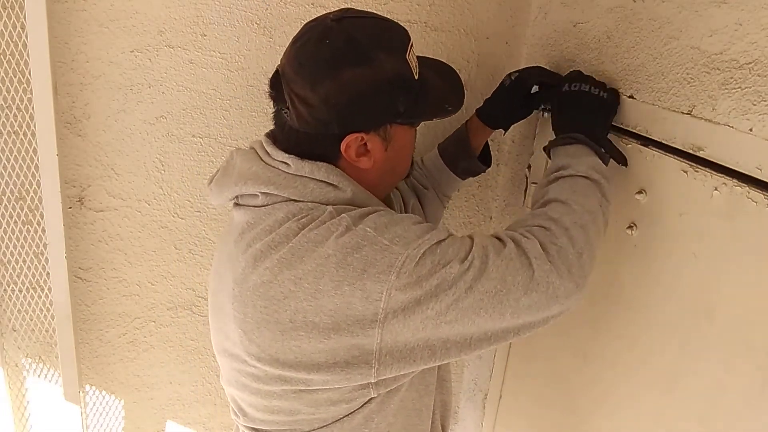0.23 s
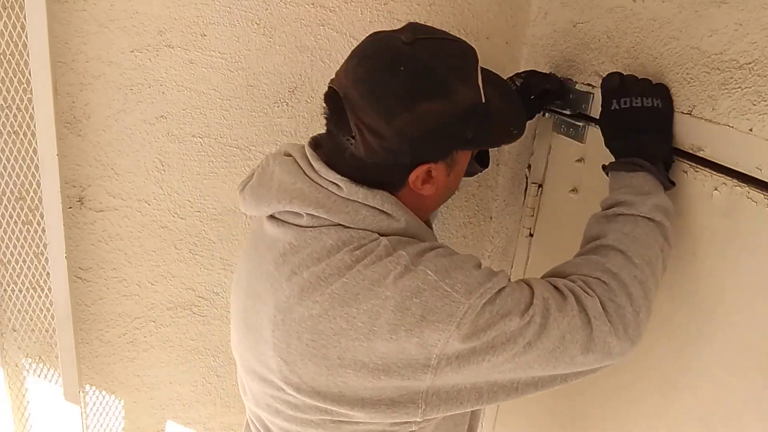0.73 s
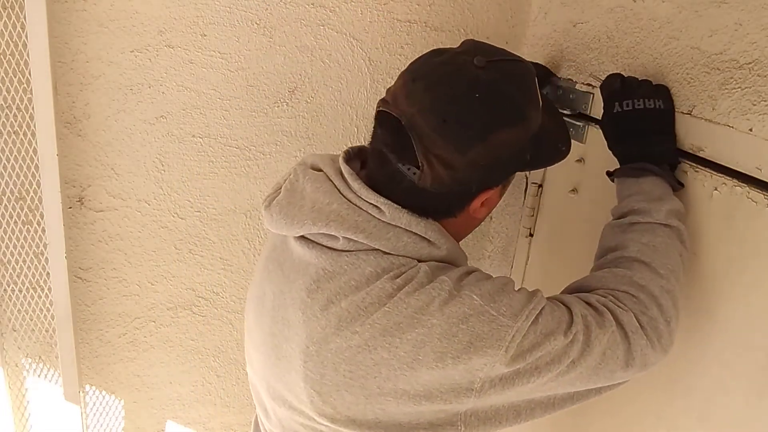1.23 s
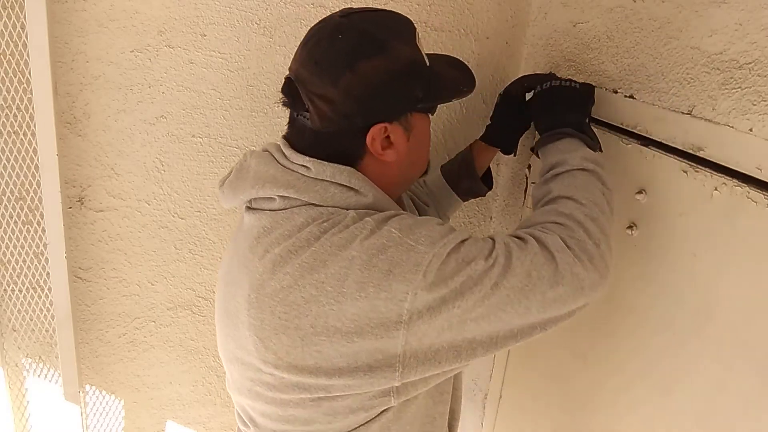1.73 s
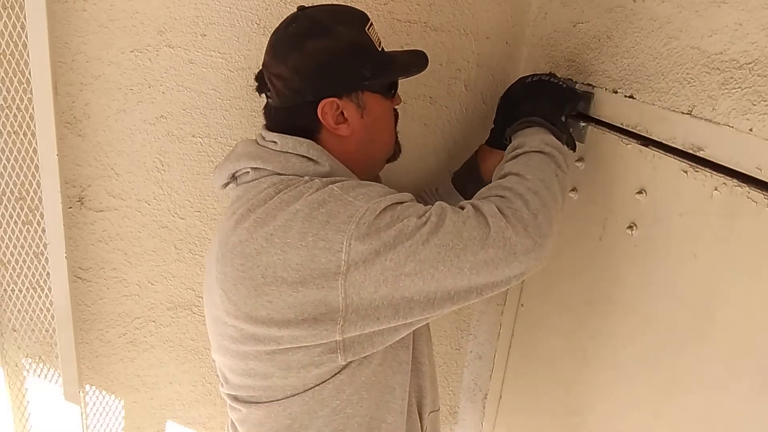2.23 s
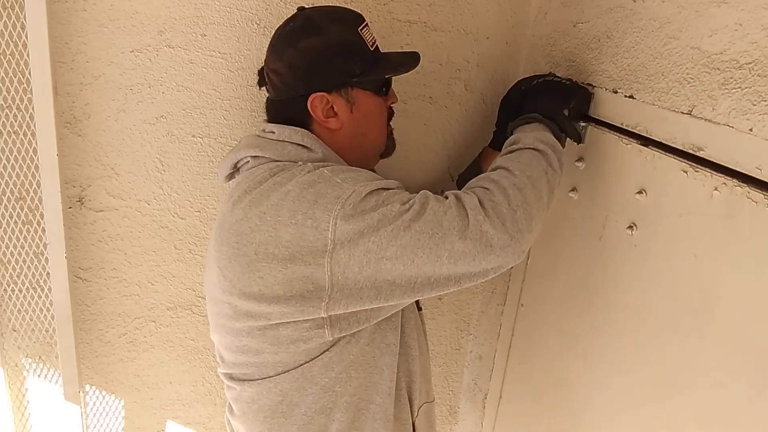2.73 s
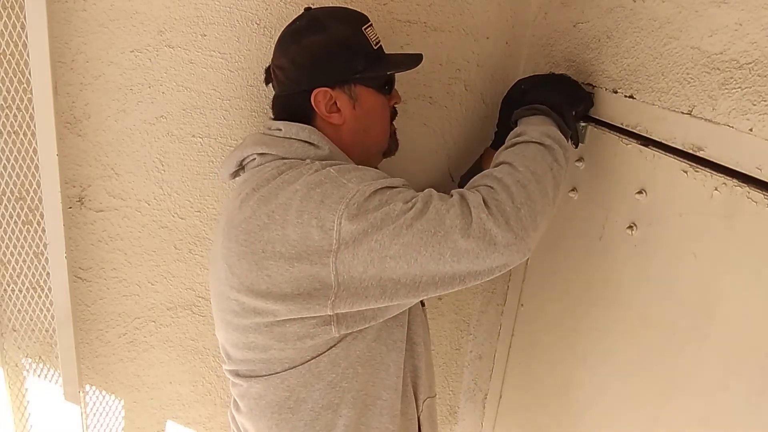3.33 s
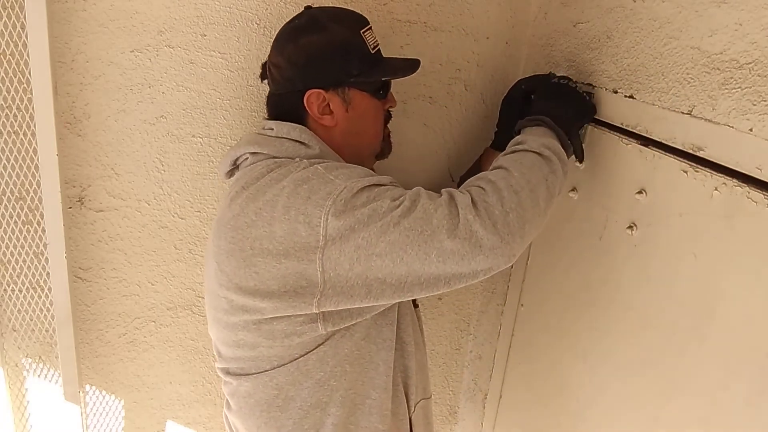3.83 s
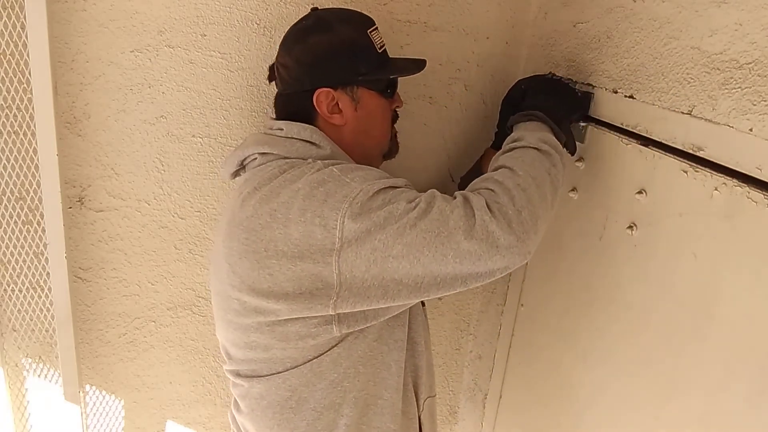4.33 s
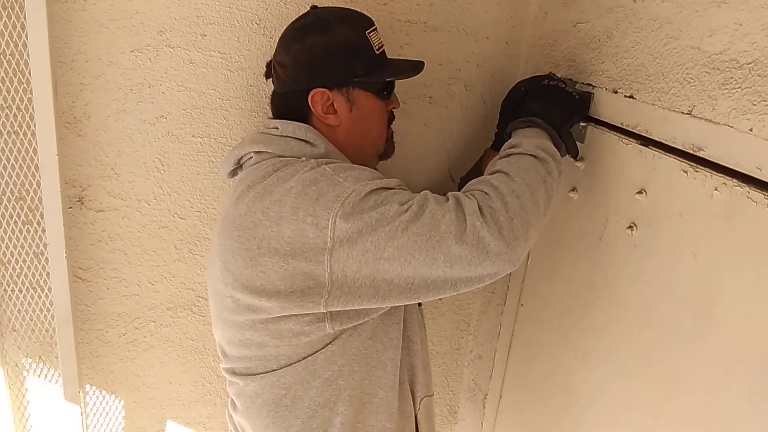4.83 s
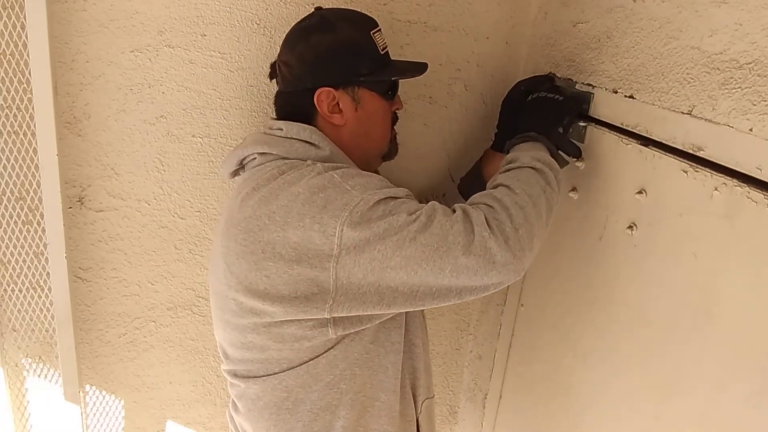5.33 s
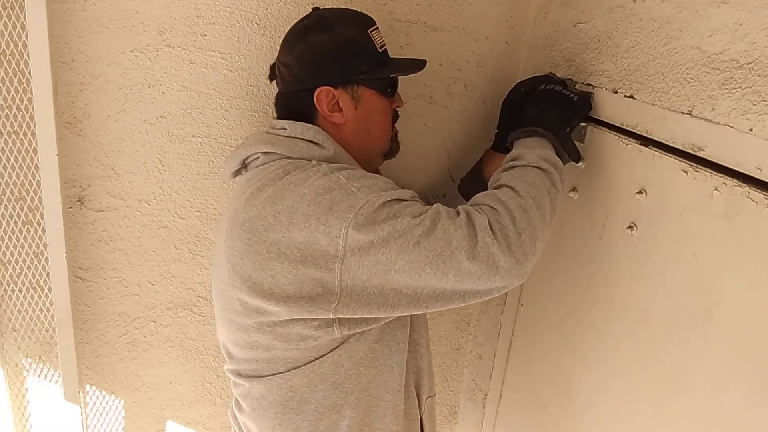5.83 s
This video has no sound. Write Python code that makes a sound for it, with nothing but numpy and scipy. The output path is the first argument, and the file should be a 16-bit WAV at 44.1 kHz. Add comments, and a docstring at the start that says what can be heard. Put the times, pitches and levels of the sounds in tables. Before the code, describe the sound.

Light metallic clicks and scrapes start at once as a hand tool works at a stubborn door hinge screw. They build to a quick cluster of sharper clacks and a scrape, thin out to scattered ticks and small knocks, then pick up again. The tool is near the microphone, with walls close around it. A soft rush of air and far traffic runs underneath, with three faint birdlike whistles.

```python
"""Sharp clacks and scrapes: a steel hand tool seats, skids and slips on a stuck screw in a door hinge.
Each touch rings the hinge leaf and the tool steel and knocks the door; strikes also shake the frame.
The worker's body shades the direct treble, which arrives mostly off the near walls.
Behind lie three faint, far, birdlike whistles (gliding, trilled tones) and a soft outdoor noise rush."""
import sys
import numpy as np
from scipy import signal
from scipy.fft import rfft, irfft, next_fast_len
from scipy.io import wavfile
from scipy.ndimage import map_coordinates

SR = 44100
rng = np.random.default_rng(int(sys.argv[2]) if len(sys.argv) > 2 else 0)


def master(y):
    """Save y as 16-bit WAV."""
    cut = np.clip(np.atleast_2d(y).T, -1, 1)
    pcm = np.round(cut * 32767)  # scale
    wavfile.write(sys.argv[1], SR, pcm.astype(np.int16))


N = 267907

# Each row: start in seconds, skid length in seconds, level in dB, steel bite in dB, bare-tip snap in dB,
# weight on the frame in dB, clack centre in Hz.
TOOL_STRIKES = [(0.042, 0.0085, -54, 1, -2.5, -10, 1750), (0.065, 0.0047, -53.5, -7.5, -6, -0.5, 1780),
                (0.289, 0.004, -63.5, -5, -3, -11, 2160), (0.314, 0.00056, -53.5, -4, -1, -5, 2220),
                (0.716, 0.0041, -73, 6.5, 12, -9, 1950), (0.752, 0.0018, -73.5, 8, 13.5, -5, 2170),
                (0.858, 0.0041, -56.5, 8.5, 6.5, 2, 1930), (0.918, 0.03, -63.5, 2.5, 4, 9, 1800),
                (1.013, .008, -76.5, 11.5, 8, 13, 1930), (1.112, 0.0047, -74.5, 6.5, 17, 17, 2190),
                (1.384, 0.0074, -64, 14, 18, 0, 2240), (1.99, 0.01, -65, -0.5, -10, 6, 1840),
                (2.207, 0.0077, -48, -2, 2, 0.5, 1920), (2.501, 0.0065, -53.5, -0.5, -1, 2.5, 1920),
                (2.529, .009, -55, 3, -3, 1.5, 1870), (2.592, 0.0096, -43, 8.5, 4, -3.5, 1930),
                (2.658, 0.013, -46.5, 8, 6, -3, 1980), (2.715, 0.0072, -47, 4.5, 3, -7.5, 2070),
                (2.751, 0.011, -50, 1.5, -6, -2.5, 2080), (2.935, 0.0038, -61, 2.5, -4, 3.5, 1990),
                (3.111, 0.013, -70.5, 6.5, 10, 11.5, 1980), (3.466, 0.0094, -74.5, 4, 6, 16.5, 1790),
                (3.67, 0.019, -62.5, 9.5, 6.5, 16.5, 2220), (3.919, 0.004, -68, 1.5, -10, 2, 1830),
                (4.207, 0.018, -51, -0.5, 0, 1.5, 1940), (4.55, 0.0037, -54, 2.5, 3, 4.5, 2050),
                (5.027, 0.0064, -52, -0.5, -2.5, -0.5, 2090), (5.098, .013, -43.5, 2.5, 4, -0.5, 2000),
                (5.135, 0.0021, -49.5, 2.5, 3.5, -5, 2340), (5.387, 0.0031, -50.5, -8, -8.5, -9, 1690),
                (5.447, 0.0035, -63, -2, -8, 9, 2070), (5.488, 0.003, -57, -3.5, -4, 14.5, 1700),
                (5.918, 0.011, -66, -12, -13, 8, 1720), (6.029, 0.007, -60.5, 2.5, -6.5, -15, 1820)]
# Tool and glove rubbing the hinge. Each row: start and end in seconds, level in dB, steel bite in dB.
RUB_STROKES = [(0, 0.005, -49.5, -0.5), (0.222, 0.356, -67, 5.5), (.42, 0.662, -66.5, -2),
               (.681, .697, -59, -1), (0.775, 0.81, -60.5, 4), (0.925, 1.043, -62, -1.5),
               (1.219, 1.301, -65, 2), (1.347, 1.371, -70.5, 13.5), (1.432, 1.483, -60.5, -1.5),
               (2.004, 2.1, -49.5, -10.5), (2.285, 2.33, -58, -2.5), (2.456, 2.512, -58.5, 1),
               (2.625, 2.66, -44, -8), (2.776, 2.826, -39, -0.5), (3.694, 3.827, -62.5, 3),
               (4.175, 4.224, -52.5, -8.5), (4.657, 4.719, -57.5, -2.5), (5.819, 5.93, -56, -10),
               (5.972, 6.066, -55, -6)]
# Resonances. Each row: frequency in Hz, bandwidth in Hz, gain in dB.
HINGE_MODES = [(1512, 207, -0.5), (1751, 57, 4.5), (1993, 230, -0.5), (2173, 240, 3), (2370, 510, 2),
               (2870, 220, 3.5)]
STEEL_MODES = [(2810, 330, -1.5), (3390, 480, -4.5), (4030, 310, -3.5), (4670, 385, -4.5),
               (4947, 158, -3.5), (5390, 430, -4.5), (5797, 680, -1), (6177, 640, -2), (6750, 175, 4.5),
               (6835, 580, -1), (7205, 650, -3)]
DOOR_MODES = [(680, 81, -6.5), (792, 81, -5), (914, 104, 1), (1165, 130, -1), (1363, 51, -2)]
FRAME_MODES = [(211, 143, -8), (259, 170, -6.5), (351, 45, 0.5), (359.5, 128, 2), (493, 460, -4.5)]
# Bare contact. Each row: frequency in Hz, relative spectral density in dB.
CRACK_SPECTRUM = [(2500, -11), (5000, -3.5), (8000, 0), (10500, -3.5), (13000, -7.5), (15800, -21)]
# Wall reverberation. Each row: frequency in Hz, 60 dB decay time in seconds.
WALL_T60 = [(200, 0.41), (900, 0.25), (2000, 0.22), (6000, 0.13), (14000, 0.23)]
# Each row: start and length in seconds, first and last pitch in Hz, glide bend (+ early, - late),
# level in dB, peak position as a fraction of length, waver as a fraction of pitch, trill rate in Hz.
BIRD_CALLS = [(.93, .44, 2225, 2580, -3.5, -59, .48, .022, 55),
              (3.29, .64, 5800, 4020, 3.1, -68, .86, .005, 29.5),
              (5.25, 1.3, 1948, 1964, .5, -62, .3, .013, 12)]
# Outdoor rush. Each row: frequency in Hz, relative spectral density in dB.
RUSH_SPECTRUM = [(30,-6.5), (70,-2), (130,-17.5), (200,-10.5), (260,-4.5), (400,-7), (670,0), (900,-1),
                 (1250,-5.5), (1670,-10), (2200,-12.5), (3100,-20), (6000,-22), (10000,-29.5),
                 (15800,-28.5)]
# Low band of the rush. Each row: time in seconds, level in dB before gain; the last level holds.
RUSH_LEVELS = [(0.0, -53.5), (0.094, -54.5), (1.9, -57.5)]

FRAME_DB, DOOR_DB, STEEL_DB, CRACK_DB = -14, -3.5, -4, -15.5  # relative to the hinge leaf
TOUCH_SAMPLES = 24000
TOUCH_S = np.arange(TOUCH_SAMPLES) / SR
TOUCH_HZ = np.fft.rfftfreq(TOUCH_SAMPLES, 1 / SR)


def tool_strikes(impulse, skid_gain, door_share):
    """The tip strikes, then skids in tiny slips; bite and snap add treble, weight shakes the door."""
    track = np.zeros(N)
    for start_s, skid_s, level_db, bite_db, snap_db, weight_db, clack_hz in TOOL_STRIKES:
        skid_s = abs(skid_s) + 1e-4
        progress = TOUCH_S / (0.3 * skid_s)
        slips = rng.standard_normal(TOUCH_SAMPLES) ** 3 * progress ** 0.63 * np.exp(-progress ** 1.045)
        force = slips / np.linalg.norm(slips) * skid_gain * skid_s / 0.0091
        force[0] += impulse
        door_db = DOOR_DB + door_share * weight_db
        steel_db = STEEL_DB + bite_db
        gains = amp(level_db) * amp([FRAME_DB + weight_db, door_db, 0, steel_db, CRACK_DB + snap_db])
        clack_octaves = 0.18 + 0.26 * skid_s / 0.0089  # a longer skid spreads the pitch
        ring_hz = steel_ring_hz(level_db + steel_db, edge_db=snap_db - bite_db)
        add(track, start_s, gains @ ringing_parts(force, clack_hz, clack_octaves, ring_hz))
    return track


def tool_scrapes(grit_db, catches_per_s, catch_db, ramp_s, door_db, hiss_db):
    """Rough steel drags over the hinge: dense grains and a few catches, too light to move the frame."""
    track = np.zeros(N)
    for start_s, end_s, level_db, bite_db in RUB_STROKES:
        length_s = max(end_s - start_s, 0.01)
        envelope = np.clip(TOUCH_S / ramp_s, 0, 1) * np.clip((length_s - TOUCH_S) / ramp_s, 0, 1)
        grains = rng.standard_normal(TOUCH_SAMPLES) * amp(grit_db * rng.standard_normal(TOUCH_SAMPLES))
        catches = amp(catch_db) * (rng.random(TOUCH_SAMPLES) < catches_per_s / SR)
        force = envelope * (unit_rms(grains) + catches)
        gains = amp(level_db) * amp([door_db, 0, bite_db, bite_db + hiss_db])
        gains *= np.sqrt(length_s * SR / TOUCH_SAMPLES)  # same power at any stroke length
        parts = ringing_parts(force, clack_hz=1827, clack_octaves=0.48, ring_hz=4650 + 66 * bite_db)
        add(track, start_s, gains @ parts[1:])
    return track


def ringing_parts(force, clack_hz, clack_octaves, ring_hz):
    """Frame, door, hinge leaf, tool steel and bare contact driven by one force, each at rms 1."""
    direct, walls = sound_paths(shade_hz=3350, echo_s=0.0086, spread_s=0.0044, tail_db=-2.5)
    drive = flatten(rfft(np.roll(force, SR // 1000)), span_hz=116)
    walls = flatten(walls, span_hz=177)
    walls /= np.sqrt(np.mean(abs(walls) ** 2))
    # Each part faces its own way, so its share of direct sound differs.
    frame = resonances(FRAME_MODES, vary_db=3.5, cutoff_hz=700, order=4) * (0.37 * direct + walls)
    door = resonances(DOOR_MODES, vary_db=2.5, cutoff_hz=1700, order=4) * (0.83 * direct + walls)
    hinge = resonances(HINGE_MODES, vary_db=1.0, cutoff_hz=3200, order=6) * (3 * direct + walls)
    steel = resonances(STEEL_MODES, vary_db=-0.5, cutoff_hz=8600, order=8) * (1.08 * direct + walls)
    crack = amp(log_interp(CRACK_SPECTRUM, TOUCH_HZ)) * (0.75 + walls)
    hinge *= tip_emphasis(clack_hz, clack_octaves, lift_db=14.5)
    steel *= tip_emphasis(ring_hz, octaves=1.0, lift_db=15.5)
    fade = np.clip(2 - 2 * TOUCH_S / TOUCH_S[-1], 0, 1) ** 4
    responses = (frame, door, hinge, steel, crack)
    return np.array([unit_rms(fade * irfft(drive * part, TOUCH_SAMPLES)) for part in responses])


def resonances(modes, vary_db, cutoff_hz, order):
    """Low-passed sum of modes of alternating sign; each touch excites them at new strengths."""
    gains = amp(vary_db * rng.standard_normal(len(modes)))
    response = 0
    for k, (mode_hz, width_hz, gain_db) in enumerate(modes):
        damping = 1j * TOUCH_HZ * width_hz
        peak = damping / (mode_hz ** 2 - TOUCH_HZ ** 2 + damping)
        response += (-1) ** k * gains[k] * amp(gain_db) * peak
    return response / (1 + (TOUCH_HZ / cutoff_hz) ** order)


def tip_emphasis(centre_hz, octaves, lift_db):
    """The spot where the tip bears favours the resonances around one pitch."""
    return amp(lift_db * np.exp(-(np.log2((TOUCH_HZ + 1) / centre_hz) / octaves) ** 2))


def steel_ring_hz(steel_db, edge_db, light_hz=4400, hard_hz=6900, hard_db=-37, drop_hz_per_db=67):
    """The steel rings higher when struck harder, lower when struck on its bare edge."""
    hardness = min(amp(steel_db - hard_db), 1)
    return max(light_hz + (hard_hz - light_hz) * hardness - drop_hz_per_db * edge_db, 1)


def sound_paths(shade_hz, echo_s, spread_s, tail_db):
    """Responses of the shaded direct path and of the walls: an echo cluster, then a short tail."""
    hz, time_s, noise = signal.stft(rng.standard_normal(TOUCH_SAMPLES), SR, nperseg=256)
    decay = amp(-60 * time_s / log_interp(WALL_T60, hz)[:, None])
    tail = signal.istft(noise * decay, SR, nperseg=256)[1][:TOUCH_SAMPLES]
    tail *= 1 - np.exp(-TOUCH_S / echo_s)
    echoes = rng.standard_normal(TOUCH_SAMPLES) ** 3 * np.exp(-((TOUCH_S - echo_s) / spread_s) ** 2)
    direct = 1 / (1 + 1j * TOUCH_HZ / shade_hz) ** 2  # treble does not bend round the worker
    early = rfft(echoes / np.linalg.norm(echoes)) * (1 - 0.42 * abs(direct))
    return direct, early + amp(tail_db) * rfft(tail / np.linalg.norm(tail))


def far_birds(wet_db, t60_s):
    """Far whistles, smeared by the surroundings."""
    calls = sum(whistle(call, trill_db=4.0, flutter_db=2) for call in BIRD_CALLS)
    tail = rng.standard_normal(TOUCH_SAMPLES) * amp(-60 * TOUCH_S / t60_s)
    return calls + amp(wet_db) * signal.fftconvolve(calls, tail / np.linalg.norm(tail))[:N]


def whistle(call, trill_db, flutter_db):
    """One wavering tone glides, its level trilling as it swells and fades."""
    start_s, length_s, first_hz, last_hz, bend, base_db, peak_at, waver, trill_hz = call
    time_s = np.arange(N) / SR
    progress = np.clip((time_s - start_s) / length_s, 0, 1)
    glide = np.expm1(-bend * progress) / np.expm1(-bend)
    pitch_hz = (first_hz + (last_hz - first_hz) * glide) * (1 + waver * wobble(130))
    swell = np.interp(progress, [0, peak_at, 1], [0, 1, 0]) ** 0.65
    level_db = base_db + trill_db * np.sin(2 * np.pi * trill_hz * time_s) + flutter_db * wobble(45)
    return swell * amp(level_db) * unit_rms(np.sin(2 * np.pi * np.cumsum(pitch_hz) / SR))


def outdoor_rush(low_gain_db, wander_db, hiss_gain_db, drone_db):
    """Far traffic and air: a gently wandering low band, steady hiss and a weak drone."""
    low_db = low_gain_db + np.interp(np.arange(N) / SR, *np.transpose(RUSH_LEVELS))
    rush = unit_rms(filtered(rng.standard_normal(N), lambda hz: amp(log_interp(RUSH_SPECTRUM, hz))))
    low = filtered(rush, lambda hz: 1 / (1 + (hz / 2000) ** 2))
    hiss = rush - low
    drone = unit_rms(filtered(rng.standard_normal(N), lambda hz: np.exp(-((hz - 158) / 6) ** 2)))
    return low * amp(low_db + wander_db * wobble(6.0)) + hiss * amp(hiss_gain_db) + drone * amp(drone_db)


def flatten(spectrum, span_hz):
    """Divide out the smoothed magnitude: contacts and echoes have no pitch of their own."""
    offset_hz = np.arange(-200, 201) * SR / TOUCH_SAMPLES
    power = signal.fftconvolve(abs(spectrum) ** 2, np.exp(-(offset_hz / span_hz) ** 2), "same")
    return spectrum / np.sqrt(abs(power) + 1e-12)


def amp(db):
    """Decibels to gain."""
    return 10 ** (np.asarray(db) / 20)


def unit_rms(x):
    """Scale to rms 1."""
    return x / np.sqrt(np.mean(x ** 2) + 1e-20)


def log_interp(points, hz):
    """Interpolate (Hz, value) points on a log axis."""
    knots_hz, values = np.transpose(points)
    return np.interp(np.log(hz + 1), np.log(knots_hz + 1), values)


def wobble(knots_per_s):
    """Smooth random curve."""
    knots = rng.standard_normal(int(N * knots_per_s / SR) + 4)
    return map_coordinates(knots, [np.arange(N) * knots_per_s / SR])


def filtered(x, response):
    """Apply a gain given as a function of Hz."""
    size = next_fast_len(N + SR // 2)
    return irfft(rfft(x, size) * response(np.fft.rfftfreq(size, 1 / SR)), size)[:N]


def add(track, start_s, sound):
    """Mix a sound into the track."""
    part = track[max(round(start_s * SR), 0):][:len(sound)]
    part += sound[:len(part)]


def scene():
    """Tool, birds and air in mono."""
    strikes = tool_strikes(impulse=0.64, skid_gain=1.28, door_share=0.29)
    scrapes = tool_scrapes(grit_db=0.5, catches_per_s=22, catch_db=23, ramp_s=0.0036,
                           door_db=-3.5, hiss_db=-13)
    birds = far_birds(wet_db=-1.5, t60_s=0.098)
    air = outdoor_rush(low_gain_db=2, wander_db=1.43, hiss_gain_db=-57, drone_db=-83.5)
    return (strikes + scrapes + birds + air)[None]


def record(dry):
    """Deep-bass cut and a hard treble limit."""
    bass_hz, top_hz = 145, 15830
    low_cut = lambda hz: 0.037 + 0.82 / (1 + (bass_hz / (hz + 1)) ** 10)
    return filtered(dry[0], lambda hz: low_cut(hz) * (hz < top_hz))[None]


dry = scene()
out = record(dry)
master(out)
```